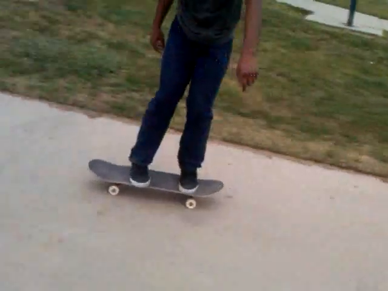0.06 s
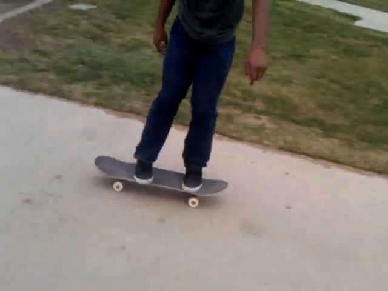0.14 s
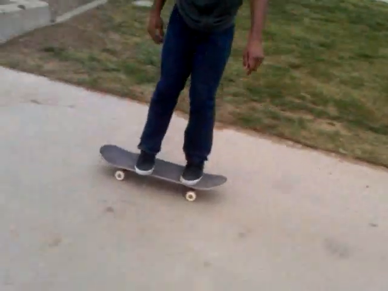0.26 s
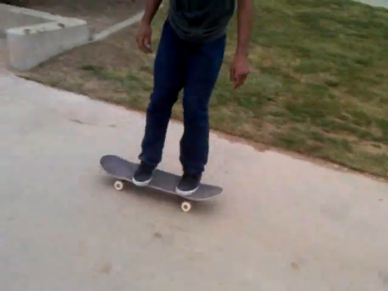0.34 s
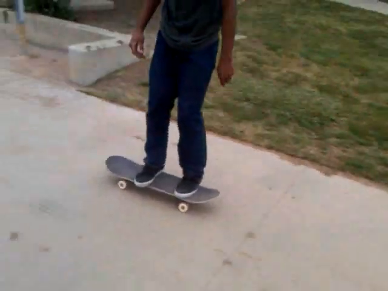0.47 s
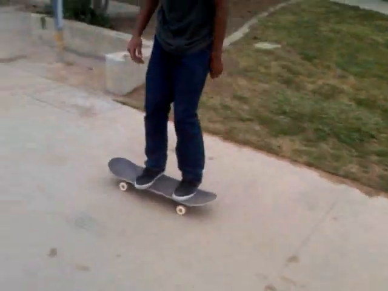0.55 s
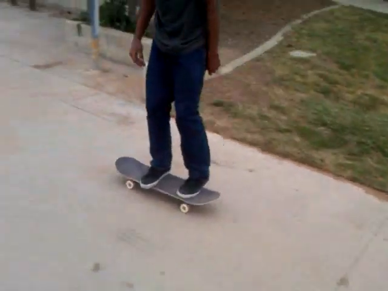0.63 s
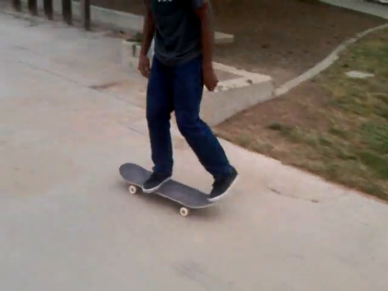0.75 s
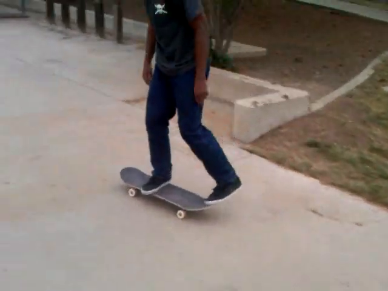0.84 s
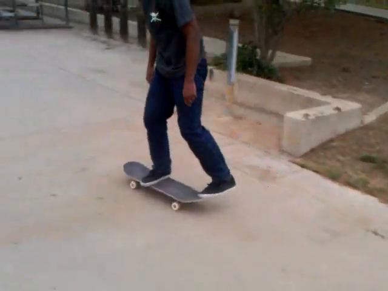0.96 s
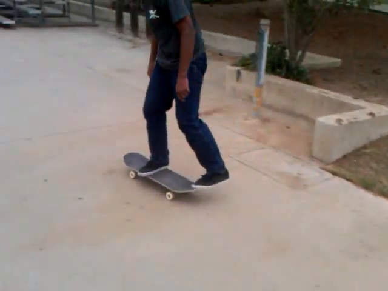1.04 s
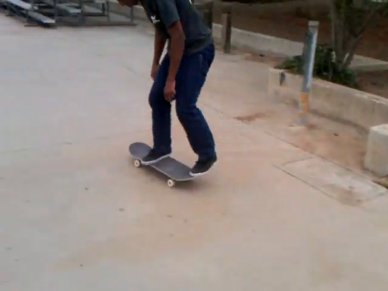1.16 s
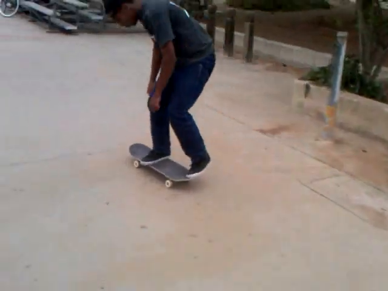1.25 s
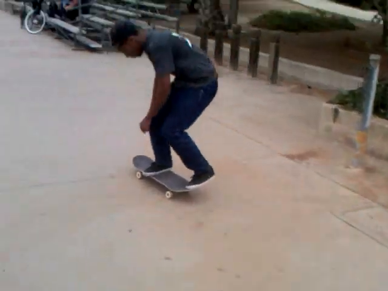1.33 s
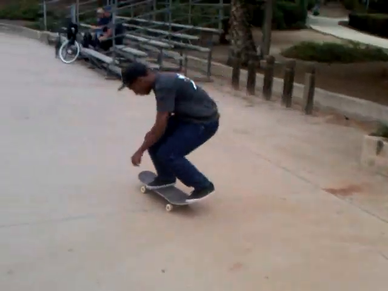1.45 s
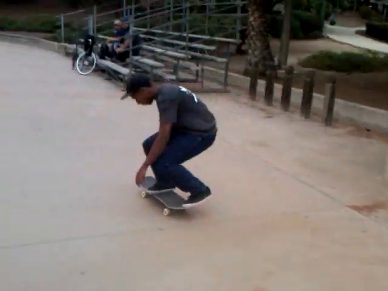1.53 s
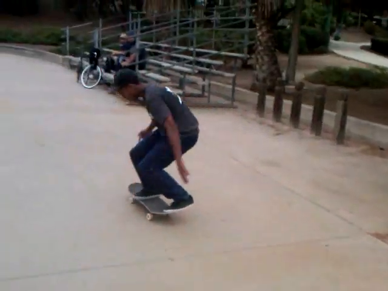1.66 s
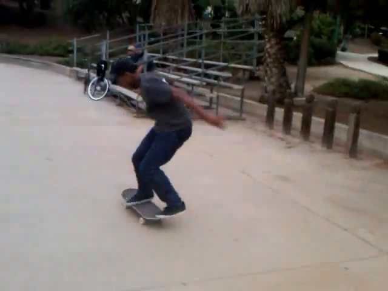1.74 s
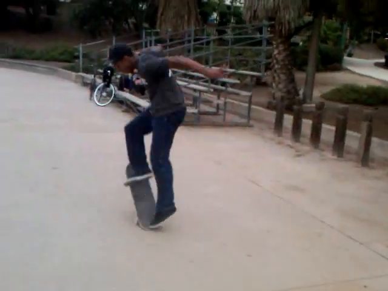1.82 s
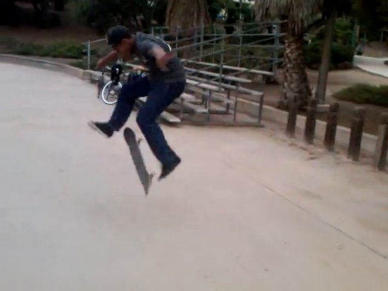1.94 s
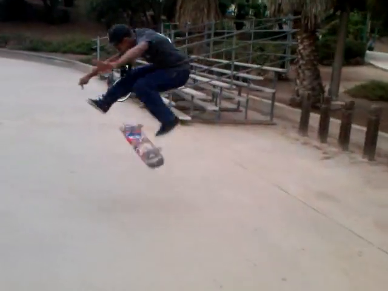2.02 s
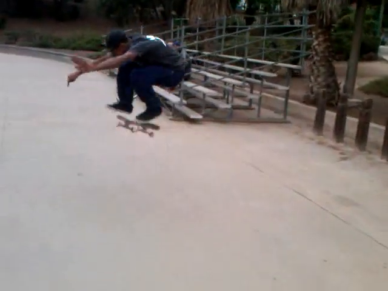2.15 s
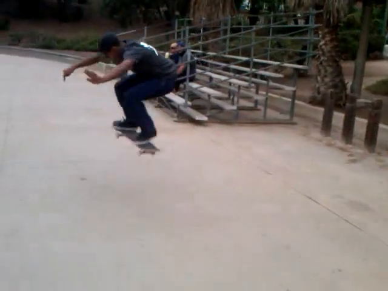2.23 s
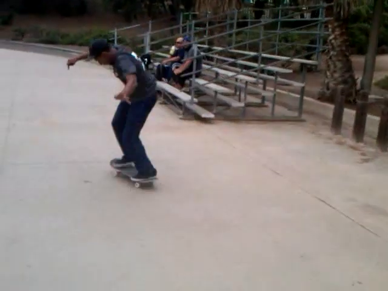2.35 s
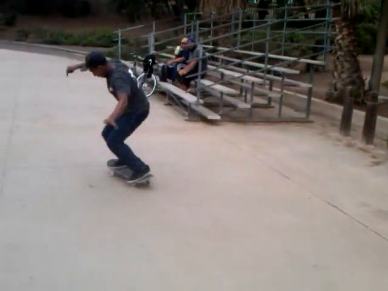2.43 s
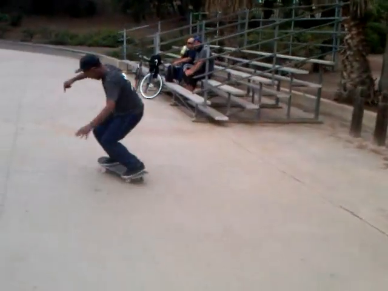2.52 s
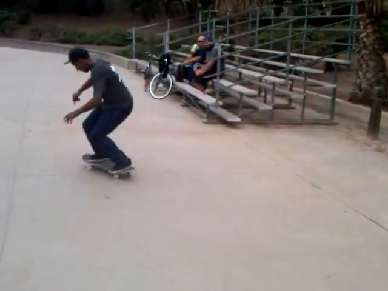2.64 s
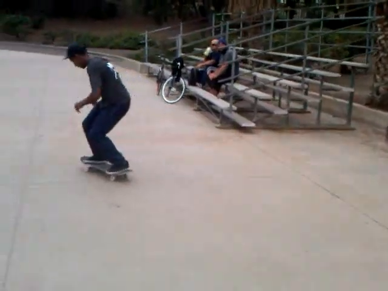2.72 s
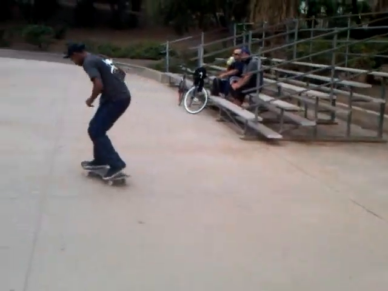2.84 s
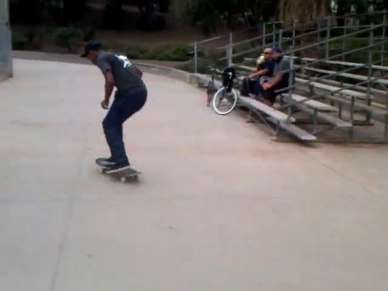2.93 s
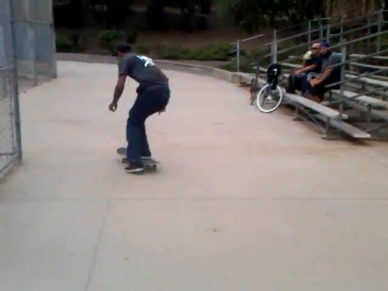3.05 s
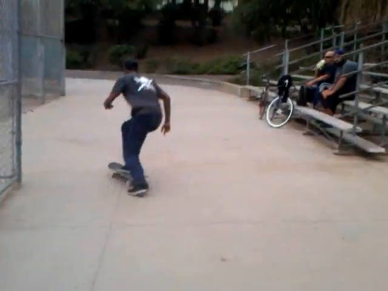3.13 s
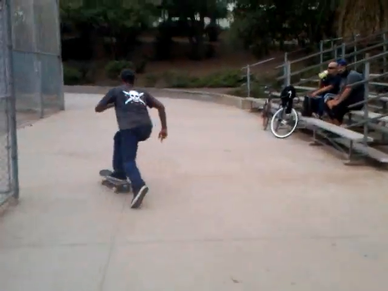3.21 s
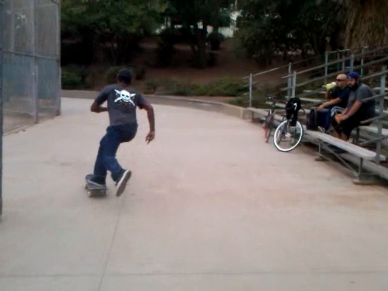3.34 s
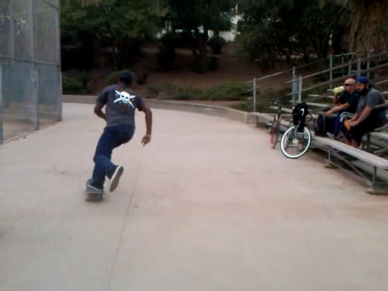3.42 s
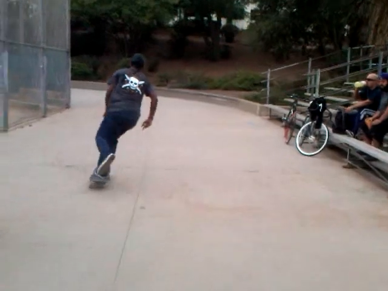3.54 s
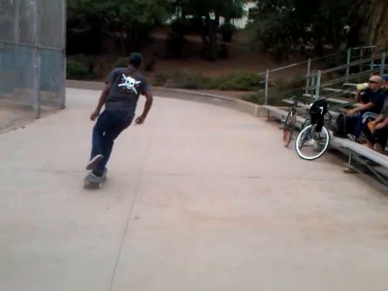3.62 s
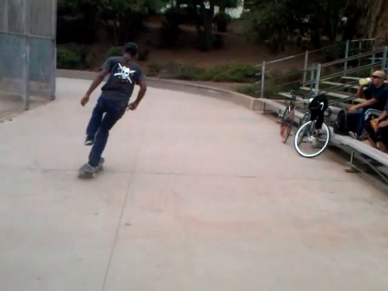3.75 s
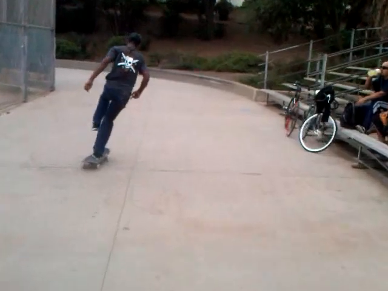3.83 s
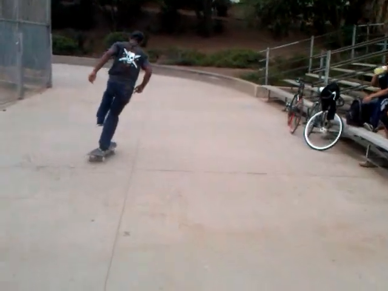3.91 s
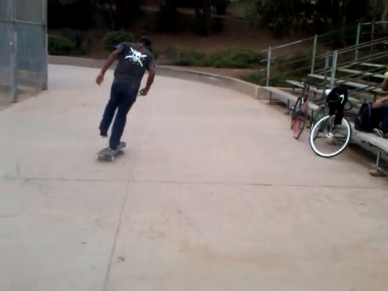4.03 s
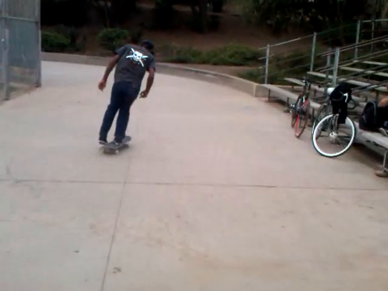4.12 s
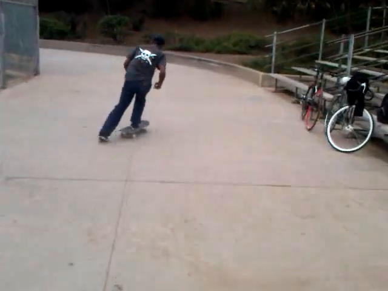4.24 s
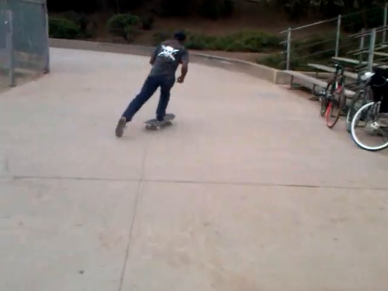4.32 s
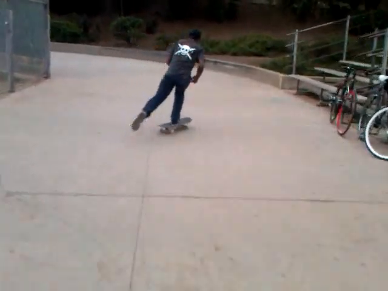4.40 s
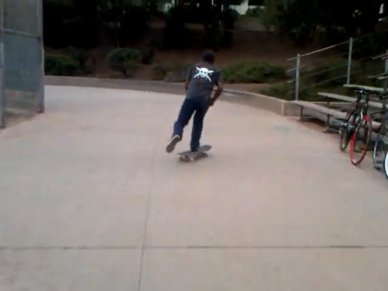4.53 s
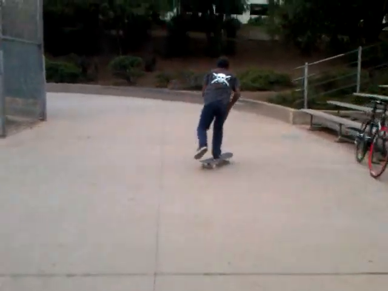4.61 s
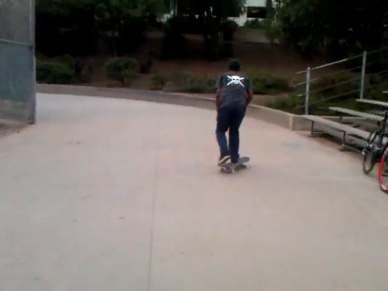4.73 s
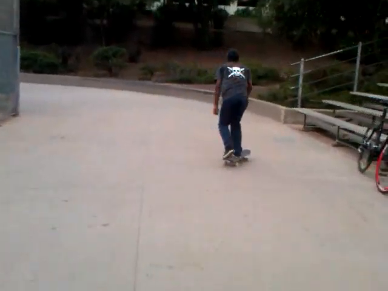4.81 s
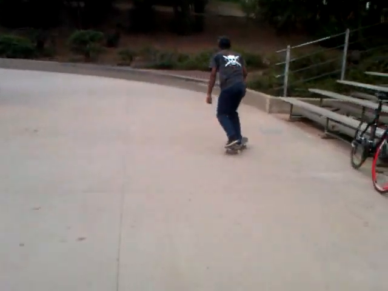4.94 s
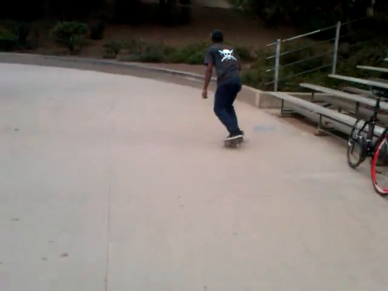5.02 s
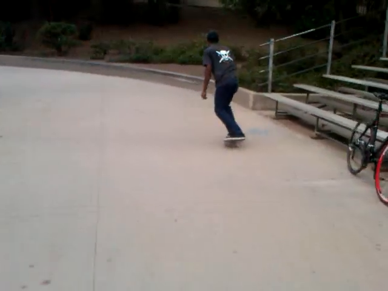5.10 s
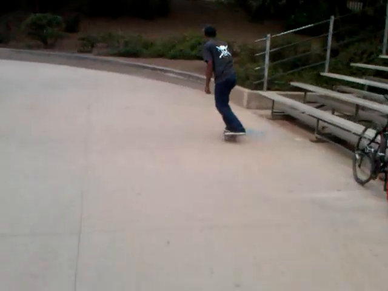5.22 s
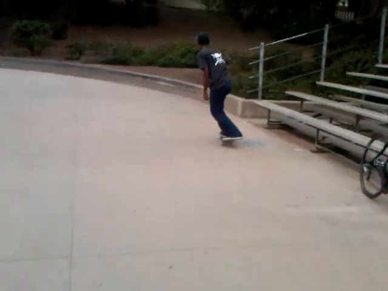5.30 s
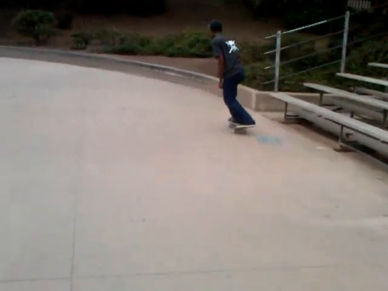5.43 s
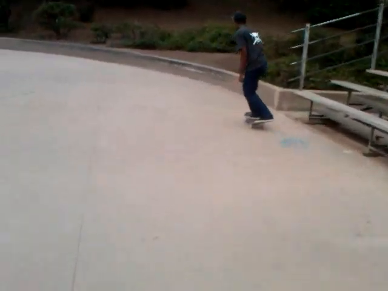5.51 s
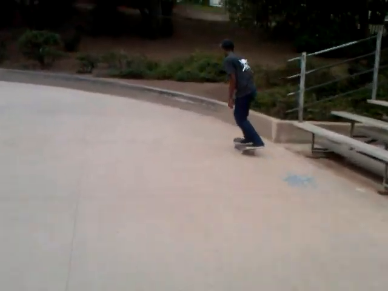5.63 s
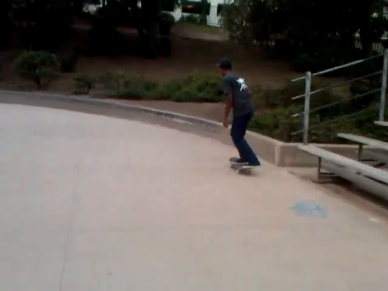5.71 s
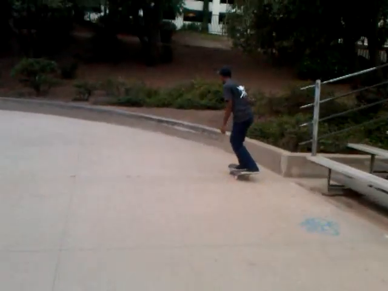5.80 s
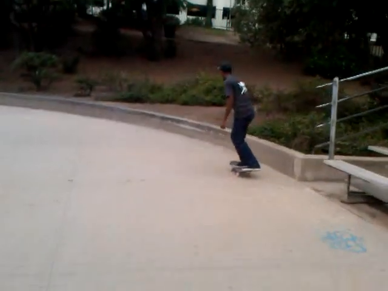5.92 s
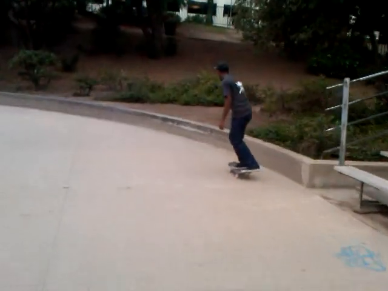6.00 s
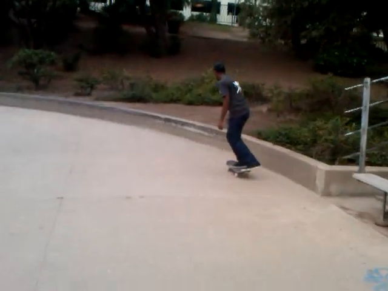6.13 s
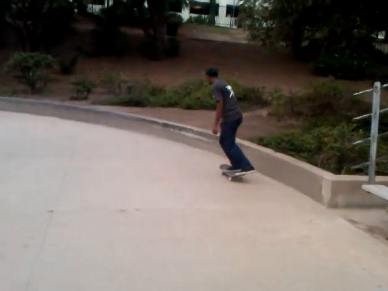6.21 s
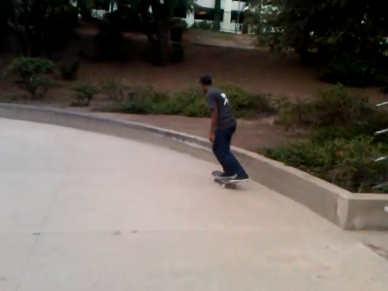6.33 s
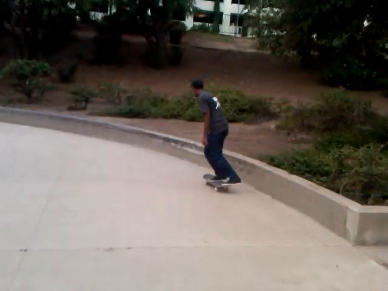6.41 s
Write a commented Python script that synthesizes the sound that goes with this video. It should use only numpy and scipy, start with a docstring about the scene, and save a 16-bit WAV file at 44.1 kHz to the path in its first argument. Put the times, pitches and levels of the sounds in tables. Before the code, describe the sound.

A skateboard rolls over outdoor concrete with a soft rumble and faint bearing hiss. Its tail pops sharply, and half a second later it lands with a loud wooden clatter that echoes briefly. Shoes scuff as the skater pushes away. A second, closer board follows, its rumble growing louder and its wheels clacking in pairs over slab joints. The small microphone sounds dull and squashes the hardest hits.

```python
"""Skateboard flip trick on concrete

A skater rolls along, pops a flip trick, lands and pushes away while a second, nearer board follows.
Grit shakes the wooden decks, bearings hiss, soles scuff, and front then rear wheels clack over each
joint between slabs. A wall and bleachers throw back the clacks of the trick, and a small, dull
microphone overloads on the hardest hits."""
import sys
import numpy as np
from scipy import signal
from scipy.fft import rfft, irfft
from scipy.io import wavfile

SR = 44100
rng = np.random.default_rng(int(sys.argv[2]) if len(sys.argv) > 2 else 0)


def digitize_waveform(pressure):
    """Quantize a signal to 16-bit integers and store it at the path in sys.argv[1].

    Rows of a 2-D input are taken as channels; values are limited to [-1, 1].
    """
    field = np.atleast_2d(pressure).T
    bounded = np.clip(field, -1, 1)
    quanta = np.round(bounded * 32767).astype(np.int16)
    wavfile.write(sys.argv[1], SR, quanta)


N = 284886
T = np.arange(N) / SR


def amp(db):
    """Turn decibels into a gain. amp(-60 * t / fade) dies away by 60 dB over the fade time."""
    return 10 ** (np.asarray(db) / 20)


def evened(x):
    """Scale a signal to an average power of one."""
    return x / np.sqrt(np.mean(x ** 2) + 1e-20)


def add(mix, start, sound):
    """Mix a sound in at a start time in seconds."""
    part = mix[round(start * SR):][:len(sound)]
    part += sound[:len(part)]


def colour(x, spectrum, size=4096):
    """Shape a sound's tone with (frequency [Hz], level [dB]) points; nothing rings ahead of a hit."""
    hz, db = np.transpose(spectrum)
    freqs = abs(np.fft.fftfreq(size, 1 / SR))
    log_gain = np.log(amp(np.interp(np.log(freqs + 1), np.log(hz), db)))
    taps = np.fft.ifft(np.exp(np.conj(signal.hilbert(log_gain)))).real
    return signal.fftconvolve(x, taps[:size // 2])[:len(x)]


def band(x, hz, kind, order=4):
    """Keep the lows, the highs or a band in between."""
    return signal.sosfilt(signal.butter(order, hz, kind, fs=SR, output="sos"), x)


def drift(rate_hz):
    """A smooth random wander, about one unit in size."""
    rolloff = 1 + (np.fft.rfftfreq(N, 1 / SR) / rate_hz) ** 2
    return evened(irfft(rfft(rng.standard_normal(N)) / rolloff, N))


def swells(rows):
    """Bell-shaped rises from rows of (time [s], half width [s], height)."""
    return sum(height * np.exp(-((T - time) / width) ** 2) for time, width, height in rows)


def resonate(x, hz, width_hz):
    """Make a sound ring around a moving pitch."""
    turn = np.exp(2j * np.pi * np.cumsum(hz) / SR)
    r = np.exp(-np.pi * width_hz / SR)
    return (turn * signal.lfilter([(1 - r) ** 2], [1, -2 * r, r ** 2], x / turn)).real


def grit(per_s, spread_db, fine):
    """Tiny hits on grains of all sizes, over the steady noise of a fine texture."""
    size = amp(spread_db * np.minimum(rng.exponential(1, N), 4))
    grains = size * rng.choice([-1, 1], N) * (rng.random(N) < per_s / SR)
    return evened(evened(grains) + fine * rng.standard_normal(N))


# Loudness as speed and distance change: (time [s], base rumble level [dB], base hiss level [dB])
ROLL_LEVELS = [(0, -34.5, -55), (0.4, -38.5, -59), (0.78, -45.5, -65), (0.92, -36, -61.5),
               (1.35, -34, -61.5), (1.65, -37.5, -61.5), (1.82, -40, -66), (2.25, -39.5, -62.5),
               (2.55, -37.5, -67.5), (2.85, -41.5, -74.5), (3.051, -42, -73.5), (3.279, -33.5, -61.5),
               (3.7, -31, -60.5), (4.42, -29.5, -57), (4.921, -26.5, -61.5), (5.601, -24.5, -58.5),
               (6.151, -25.5, -63.5), (6.46, -28, -64)]
# How much of the rolling comes from the near board: (time [s], share [0-1])
NEAR_SHARE = [(1.3, 0.3), (2.2, 0.82), (3.2, 0.81), (4.4, 1)]
# Rough stretches of concrete: (time [s], half width [s], extra rumble [dB], extra whirr [dB])
ROUGH_PATCHES = [(1.68, 0.1, 5, 3), (3.2, 0.077, 5.5, -6), (3.41, 0.14, 10, 4), (4.647, 0.15, 8, 9),
                 (5.8, 0.18, 3.5, 2)]
# The tone of each rolling board: (frequency [Hz], level [dB])
FAR_ROLL_TONE = [(40, -12.5), (110, -33.5), (235, -5), (360, -22.5), (520, 3), (680, 3), (860, -19),
                 (1000, -5.5), (1180, -5), (1620, -10.5), (1950, -38.5), (2200, -49.5), (3000, -51.5),
                 (5000, -64.5)]
NEAR_ROLL_TONE = [(40, -19), (105, -22.5), (145, -12), (220, -13), (340, -3.5), (400, -3), (468, -2.5),
                  (560, -4), (780, -5), (990, -14.5), (1190, -10), (1570, -17), (1950, -41.5), (2750, -39),
                  (4500, -60)]


def rolling(near_whirr_db=-9.5, hiss_db=-2.0, split_hz=920, turn_hz=21, throb_db=1.16):
    """Grit shakes both decks into a low rumble and a higher whirr; uneven wheels throb once a turn."""
    times, *columns = np.transpose(ROLL_LEVELS)
    level, hiss = (np.interp(T, times, column) for column in columns)
    near = np.interp(T, *np.transpose(NEAR_SHARE))
    rumble = level + swells((time, width, db) for time, width, db, _ in ROUGH_PATCHES)
    whirr = level + swells((time, width, db) for time, width, _, db in ROUGH_PATCHES)
    whirr += near * near_whirr_db  # the near board is duller
    turns = np.cumsum(turn_hz * (1 + 0.1566 * drift(1.6))) / SR
    throb = amp(throb_db * np.sin(2 * np.pi * turns))
    far_deck = evened(colour(throb * grit(per_s=900, spread_db=2.1, fine=1), FAR_ROLL_TONE))
    near_deck = evened(colour(throb * grit(per_s=1100, spread_db=2.3, fine=1), NEAR_ROLL_TONE))
    far_deck += wheel_hum(FAR_WHEEL_NOTES, waver=0.014, flare_db=5)
    near_deck += wheel_hum(NEAR_WHEEL_NOTES, waver=0.023, flare_db=4)
    out = amp(hiss + hiss_db) * bearing_hiss(throb)
    for kind, db in (("low", rumble), ("high", whirr)):
        far_part = evened(band(far_deck, split_hz, kind, order=5))
        near_part = evened(band(near_deck, split_hz, kind, order=5))
        patchy_db = drift(16)  # coarse and fine texture change separately along the slab
        out += amp(db + patchy_db) * (np.sqrt(1 - near) * far_part + np.sqrt(near) * near_part)
    return out


# The notes each board's wheels hum: (pitch [Hz], width [Hz], relative level [dB])
FAR_WHEEL_NOTES = [(545, 146, -3), (1173, 120, -8.5), (1605, 170, -12)]
NEAR_WHEEL_NOTES = [(337.2, 40.4, -10.5), (465.5, 33, -6.5), (805.7, 29, -15.5), (1179, 76, -14)]


def wheel_hum(notes, waver, flare_db):
    """Wheels hum; the rider's shifting weight bends each note and lets it flare up briefly."""
    out = np.zeros(N)
    for hz, width, db in notes:
        flare = amp(flare_db * drift(7))
        note = resonate(rng.standard_normal(N), hz * (1 + waver * drift(1.9)), width)
        out += amp(db) * evened(flare * note)
    return out


# The tone of the ball bearings: (frequency [Hz], level [dB])
BEARING_TONE = [(1500, -33.5), (2200, -5), (3050, -12.5), (3700, 2), (3950, -3), (4250, 7), (4700, -1.5),
                (5300, -9.5), (6000, -2), (6700, -4.5), (7400, -17)]


def bearing_hiss(throb):
    """Spinning bearings hiss, pulsing with the wheels and jumping at each slab joint."""
    return joint_jolts() * evened(colour(throb * rng.standard_normal(N), BEARING_TONE))


# The tone of the outdoor background: (frequency [Hz], level [dB])
AIR_TONE = [(20, -10.5), (55, 1.5), (100, -3.5), (250, 2), (700, -14), (1500, -33.5), (2000, -28.5),
            (7000, -62.5)]


def outdoor_air(level_db=-50):
    """A faint, steady, low rush from far away."""
    return amp(level_db) * evened(colour(rng.standard_normal(N), AIR_TONE))


# Soles and wheels scraping concrete or grip tape: (time [s], half width [s], level [dB])
SCUFF_STROKES = [(0.08, 0.51, -45), (1.392, 0.024, -32), (3.299, 0.066, -28), (4.41, 0.057, -35.5),
                 (4.635, 0.039, -30), (5.701, 0.062, -27.5)]
# The tone of a scrape: (frequency [Hz], level [dB])
SCUFF_TONE = [(200, -38.5), (500, 1.5), (900, 4.5), (1450, 6), (1950, -15.5), (2450, -15.5), (3100, -24.5),
              (7000, -52.5)]


def scuffs(rasp_db=4.5):
    """Rubber drags over grit in short swells, catching and slipping as it goes."""
    pressure = swells((time, width, amp(db)) for time, width, db in SCUFF_STROKES)
    catching = amp(rasp_db * np.tanh(drift(150)))
    return pressure * evened(colour(catching * rng.standard_normal(N), SCUFF_TONE))


def ringing(notes, t, ring):
    """Fading notes, their fade times scaled by ring; foot pressure and the spot hit vary each a little."""
    out = np.zeros(len(t))
    for k, (hz, db, fade) in enumerate(notes):
        envelope = amp(db + rng.normal(0, 2.64) - 60 * t / (ring * fade))
        pitch = hz * rng.normal(1, 0.032)
        out += (-1) ** k * envelope * np.sin(2 * np.pi * pitch * t)
    return out


# The notes of a steel axle: (pitch [Hz], relative level [dB], fade time [s])
AXLE_NOTES = [(2270, -4.5, 0.042), (2673, 14, 0.029), (3990, 1.5, 0.054)]
# The dry crack of a truck, the metal mount that holds an axle: (frequency [Hz], level [dB])
TRUCK_TONE = [(1500, 2), (2300, 8), (3200, 0), (3950, 4.5), (4700, -5.5), (5400, -6.5), (6600, -5.5),
              (7400, -11)]


def knocks(hits, deck_notes, ring, rattle, crack_fade_s, ping_db, buzz_db, crack_top_hz, split_hz=880):
    """A hit and its chatter ring the deck and crack the truck; harder hits favour the higher notes."""
    size, span = 12000, 0.012 * SR  # each part's energy is spread over the span to set its level
    t, out = T[:size], np.zeros(N)
    rise = 1 - np.exp(-t / 0.0015)
    lag = round(0.0008 * SR)  # the truck's crack is held back slightly so it sounds together with the wood's knock
    for time, db, hard_db, crack_db, fade in hits:
        chatter, fizz = rng.standard_normal((2, size))
        blow = rattle * chatter * amp(-60 * t / fade) / np.sqrt(fade * SR)
        blow[0] += 1
        wood = signal.fftconvolve(blow, ringing(deck_notes, t, ring))[:size]
        wood = band(wood, 1700, "low", order=12)
        wood = band(wood, 170, "high", order=2)
        buzz = amp(buzz_db - 60 * t / (2 * fade))  # loose hardware outlasts the chatter
        crack = colour(fizz * (amp(-60 * t / crack_fade_s) + buzz), TRUCK_TONE)
        axle = amp(ping_db) * evened(ringing(AXLE_NOTES, t, ring=1))
        metal = band((evened(crack) + axle) * rise, crack_top_hz, "low", order=2)
        metal = np.pad(metal, (lag, 0))[:size]
        parts = band(wood, split_hz, "low"), band(wood, split_hz, "high"), metal
        soft = 1 / np.hypot(1, amp(hard_db))  # low and high notes share the energy of the hit
        gains = soft, soft * amp(hard_db), amp(crack_db)
        knock = sum(gain * part / np.linalg.norm(part) for gain, part in zip(gains, parts))
        add(out, time, amp(db) * np.sqrt(span) * knock)
    return out


# Dull knocks of feet and bumps on a deck: (time [s], level [dB])
DECK_BUMPS = [(0.138, -33.5), (0.471, -32.5), (1.631, -23.5), (3.519, -20), (4.774, -19.5), (5.538, -19.5),
              (5.898, -20.5), (6.23, -29), (6.379, -27.5), (6.404, -21.5)]
# Slab joints, hit by the front wheels and then the rear: (front time [s], rear time [s],
# front level [dB], rear level [dB], hardness [dB], crack [dB], chatter fade time [s])
SLAB_JOINTS = [(0.479, 0.596, -23.5, -36.5, -7.5, -25.5, 0.029),
               (1.2883, 1.403, -26, -29.5, -7.5, -20.5, 0.04), (3.9651, 4.075, -18, -24, 11, -26.5, 0.066),
               (4.854, 4.9915, -13.5, -19.5, -2.5, -17.5, 0.0076),
               (5.7091, 5.7986, -12, -12.5, -4, -11.5, 0.026),
               (5.998, 6.102, -17.5, -16.5, 4.5, -24.5, 0.075)]
# Light rattles of a loose truck: (time [s], level [dB], crack [dB])
TRUCK_RATTLES = [(0.52, -36.5, -15.5), (1.543, -32, -25), (2.47, -41, -11.5), (3.391, -27.5, -29),
                 (4.113, -28, -27)]
# A wheel hops out of a deep joint and lands with a short tock: (time [s], level [dB], crack [dB])
WHEEL_HOPS = [(3.9705, -19.5, -22.5), (5.0016, -17, -21), (5.742, -20, -22.5), (5.809, -13.5, -22)]


def clacks(handover_s=3):
    """Knocks while rolling: on the skater's far board before the handover, on the near one after it."""
    hits = []  # (time [s], level [dB], hardness [dB], crack [dB], chatter fade time [s])
    for front_s, rear_s, front_db, rear_db, *edge in SLAB_JOINTS:
        hits += [(front_s, front_db, *edge), (rear_s, rear_db, *edge)]
    hits += [(time, db, -14, -32.5, 0.022) for time, db in DECK_BUMPS]
    hits += [(time, db, -7, crack_db, 0.008) for time, db, crack_db in WHEEL_HOPS]
    hits += [(time, db, 6, crack_db, 0.051) for time, db, crack_db in TRUCK_RATTLES]
    early = [hit for hit in hits if hit[0] < handover_s]
    late = [hit for hit in hits if hit[0] >= handover_s]
    return far_knocks(early) + near_knocks(late)


# The notes of the skater's wooden deck: (pitch [Hz], relative level [dB], base fade time [s])
FAR_DECK_NOTES = [(340, -9.5, 0.027), (451, 6, 0.04), (564, 7, 0.036), (639, -2, 0.097), (1054, 4.5, 0.02),
                  (1130, -3.5, 0.078), (1390, -6.5, 0.1), (1411, -3, 0.068), (1670, -11, 0.029)]


def far_knocks(hits):
    """The skater's board: the wood rings briefly and the truck's crack lingers."""
    return knocks(hits, FAR_DECK_NOTES, ring=0.31, rattle=3.8,
                  crack_fade_s=0.1, ping_db=-17, buzz_db=-17.5, crack_top_hz=5500)


# How long sound hangs in the park: (frequency [Hz], fade time [s])
PARK_FADES = [(200, 0.45), (1200, 0.29), (2500, 0.22), (7000, 0.23)]


def park_reverb(x):
    """Scattered reflections of the open park; the lows last longest."""
    reflections = rng.standard_normal(SR) * (rng.random(SR) < 0.06) * (T[:SR] > 0.012)
    hz, t, bands = signal.stft(reflections, SR, nperseg=256)
    fades = np.interp(hz, *np.transpose(PARK_FADES))[:, None]
    tail = signal.istft(bands * amp(-60 * t / fades), SR, nperseg=256)[1]
    return signal.fftconvolve(x, tail / np.linalg.norm(tail))[:N]


# Low bounces in deep joints, under the feet, at the pop and on landing:
# (time [s], level [dB], rough pitch [Hz], fade time [s])
DECK_BOUNCES = [(0.478, -8.5, 214, 0.027), (0.521, -19, 211.2, 0.038), (0.597, -17, 217, 0.035),
                (1.635, -18.5, 368, 0.069), (1.708, -14, 376, 0.042), (2.062, -10.5, 280, 0.03),
                (2.563, -11, 302, 0.03), (2.575, -6, 212, 0.061), (2.588, -5, 287, 0.022),
                (4.854, -17.5, 260, 0.016)]


def thumps():
    """The loaded deck bounces on the rubber cushions of its trucks."""
    t, out = T[:SR // 4], np.zeros(N)
    for time, db, hz, fade in DECK_BOUNCES:
        pitch = hz * rng.normal(1, 0.05)
        envelope = amp(db - 60 * t / fade) * (1 - np.exp(-t * hz))
        add(out, time, envelope * np.sin(2 * np.pi * pitch * t))
    return out


def joint_jolts(jump_db=17, linger=1.55):
    """A gain for the hiss: each joint shakes the bearings, which settle a little after the chatter."""
    shaking = sum((T >= time) * amp(-60 * abs(T - time) / (linger * fade))
                  for front_s, rear_s, *_, fade in SLAB_JOINTS for time in (front_s, rear_s))
    return 1 + amp(jump_db) * shaking


# A jolted axle or washer rings on: (time [s], pitch [Hz], level [dB], fade time [s])
STEEL_PINGS = [(1.371, 2500, -44, 0.11), (4.076, 2140, -40, 0.042), (5.004, 4030, -41, 0.024),
               (5.807, 4000, -18.5, 0.028), (6.001, 4150, -39, 0.037)]


def pings(detune=0.011, upper_db=-7):
    """Steel parts ring briefly with two notes close together."""
    t, out = T[:SR // 4], np.zeros(N)
    for time, hz, db, fade in STEEL_PINGS:
        lower = np.sin(2 * np.pi * hz * t)
        upper = amp(upper_db) * np.sin(2 * np.pi * (hz * (1 + detune) * t + rng.random()))
        envelope = amp(db - 60 * t / fade) * (1 - np.exp(-t * SR / 20))
        add(out, time, envelope * (lower + upper))
    return out


# The tail pop and the landing: (time [s], level [dB], hardness [dB], crack [dB], chatter fade time [s])
TRICK_HITS = [(2.0625, -30.5, -13, -7.5, 0.014), (2.0655, -26, 11, -3, 0.019),
              (2.075, -23.5, 25, -20.5, 0.025), (2.5638, -13.5, -4.5, -20, 0.063),
              (2.574, -21, 4.5, -10, 0.012), (2.587, -15.5, -2, -29, 0.035),
              (2.5985, -16.5, -17.5, -17, 0.0076), (2.603, -16, 4.5, -10.5, 0.017),
              (2.628, -21.5, 18, -29, 0.025), (2.641, -30.5, 6, -17.5, 0.016),
              (2.654, -29.5, 8.5, -24.5, 0.11)]


def pop_and_landing():
    """The skater's board strikes the ground, then clatters down half a second later."""
    return knocks(TRICK_HITS, FAR_DECK_NOTES, ring=0.47, rattle=5.2,
                  crack_fade_s=0.0034, ping_db=-17, buzz_db=-4.5, crack_top_hz=7000)


# The tail slaps the concrete, then the feet slap the deck: (time [s], level [dB], fade time [s])
SLAP_HITS = [(2.0632, -20, 0.034), (2.575, -29, 0.0085), (2.6035, -31, 0.011)]
# The tone of slapped wood: (frequency [Hz], level [dB])
SLAP_TONE = [(150, -21), (350, 12), (700, 1), (1000, -10.5), (1400, 16.5), (1650, 8), (1950, -19.5),
             (2400, -14), (3150, -22), (4000, -8), (4600, -3.5), (5200, -23), (6300, -19.5), (7400, -25)]


def slaps(rise_s=0.0006, span_s=0.012):
    """Wood meets a surface flat on: a broad burst with no pitch."""
    t, out = T[:SR // 4], np.zeros(N)
    for time, db, fade in SLAP_HITS:
        envelope = amp(-60 * t / fade) * (1 - np.exp(-t / rise_s))
        burst = colour(rng.standard_normal(len(t)) * envelope, SLAP_TONE)
        add(out, time, amp(db) * burst * np.sqrt(span_s * SR) / np.linalg.norm(burst))
    return out


# Echoes off the wall and bleachers: (delay [s], level [dB])
WALL_ECHOES = [(0.047, -16)]


def wall_echoes(x):
    """Hard surfaces nearby throw back the middle frequencies of a loud clack."""
    out, mids = np.zeros(N), band(x, [750, 4200], "band", order=2)
    for delay, db in WALL_ECHOES:
        add(out, delay, amp(db) * mids)
    return out


# The shoe's stroke along the grip tape: (start [s], end [s], level [dB])
FLICK_STROKE = (2.079, 2.139, -36)


def shoe_flick(edge_s=0.004):
    """After the pop the shoe drags up the grip tape and leaves the board's nose."""
    start, end, db = FLICK_STROKE
    contact = np.clip(np.minimum(T - start, end - T) / edge_s, 0, 1)
    scrape = colour(grit(per_s=1500, spread_db=3, fine=0.61), SLAP_TONE)
    return amp(db) * contact * evened(scrape)


# The notes of the near wooden deck: (pitch [Hz], relative level [dB], base fade time [s])
NEAR_DECK_NOTES = [(134, -3.5, 0.038), (289, 1.5, 0.035), (465, -0.5, 0.073), (634, 4, 0.042),
                   (845, 5, 0.035), (1116.5, -5, 0.092), (1218, -8, 0.088), (1480, 0.5, 0.01)]


def near_knocks(hits):
    """The following board: the wood rings longer and its tight trucks snap briefly."""
    return knocks(hits, NEAR_DECK_NOTES, ring=0.78, rattle=5.5,
                  crack_fade_s=0.025, ping_db=-13, buzz_db=4, crack_top_hz=5050)


# Wheels slip sideways in a turn: (time [s], half width [s], middle pitch [Hz], level [dB])
WHEEL_SLIPS = [(5.685, 0.019, 1650, -33), (6.021, 0.023, 1160, -32.5)]


def squeaks(rise_per_s=2.9, width_hz=80):
    """A slipping rubbery wheel chatters in a short, rough, rising note."""
    out = np.zeros(N)
    for time, width, hz, db in WHEEL_SLIPS:
        pitch = hz * (1 + rise_per_s * np.clip(T - time, -2 * width, 2 * width))
        note = evened(resonate(rng.standard_normal(N), pitch, width_hz))
        out += swells([(time, width, amp(db))]) * note
    return out


def scene():
    """Both boards, the trick and the park around them, in one channel."""
    trick = slaps() + pop_and_landing()
    clatter = clacks()
    air = outdoor_air()
    park = park_reverb(amp(-12.5) * trick + amp(-16) * clatter) + wall_echoes(trick)
    riding = rolling() + scuffs() + shoe_flick() + squeaks() + thumps() + pings()
    return (riding + trick + clatter + park + air)[None]


def record(dry, limit_db=-9.0, attack_s=0.00082, recover_db_per_s=200, ceiling=0.4, top_hz=7400):
    """A fast limiter holds down each loud clack after its first peak; peaks are rounded, treble cut."""
    r, recovery = np.exp(-1 / (attack_s * SR)), recover_db_per_s * T
    over_db = np.maximum(20 * np.log10(abs(dry) + 1e-9) - limit_db, 0)
    over_db = np.maximum.accumulate(over_db + recovery, axis=-1) - recovery
    held = dry / amp(signal.lfilter([1 - r], [1, -r], over_db))
    rounded = held / (1 + (held / ceiling) ** 8) ** (1 / 8)
    treble_cut = signal.firwin(511, top_hz, window=("kaiser", 9), fs=SR)
    return signal.oaconvolve(rounded, treble_cut[None], "same")


dry = scene()
out = record(dry)
digitize_waveform(out)
```